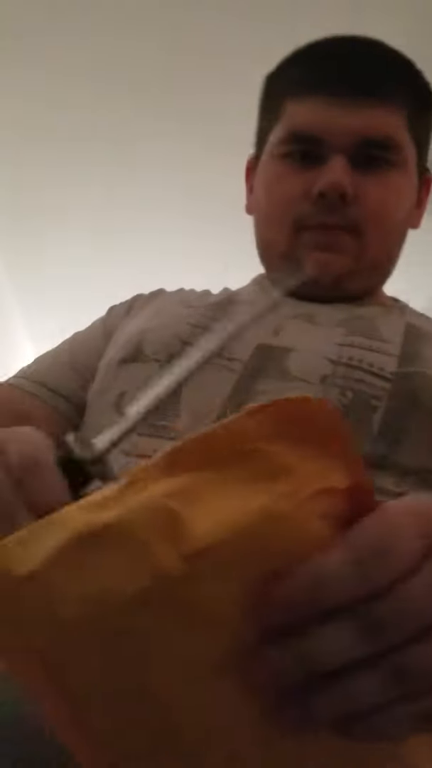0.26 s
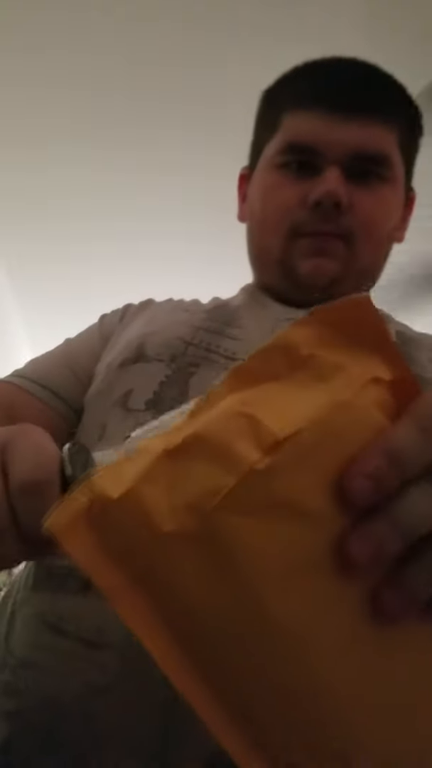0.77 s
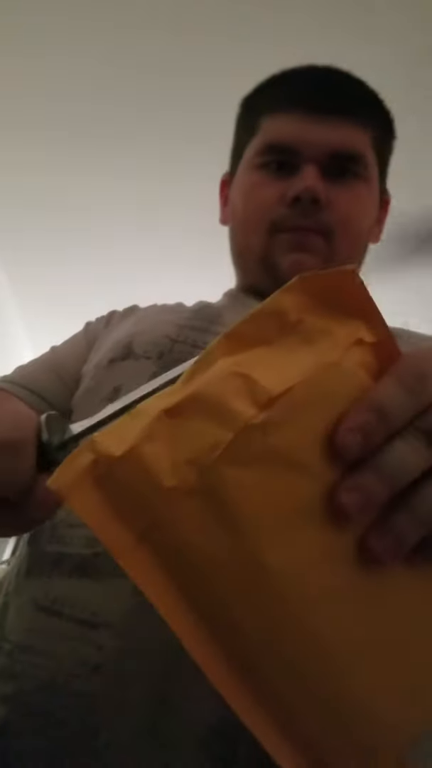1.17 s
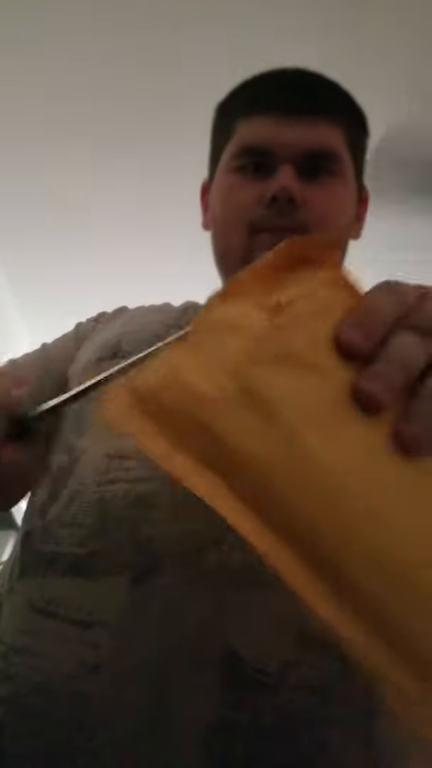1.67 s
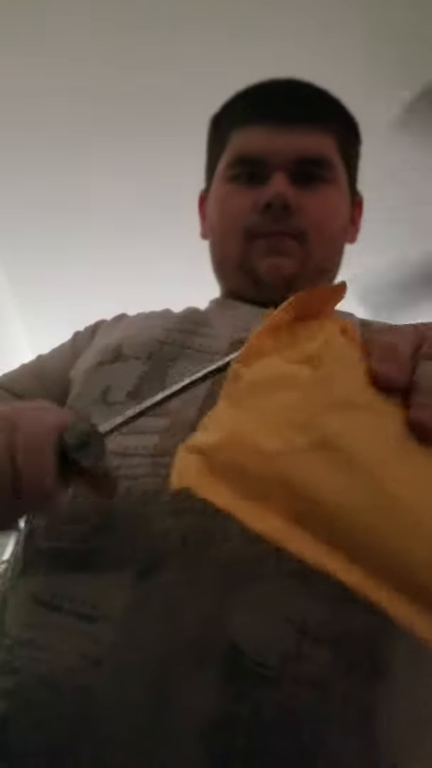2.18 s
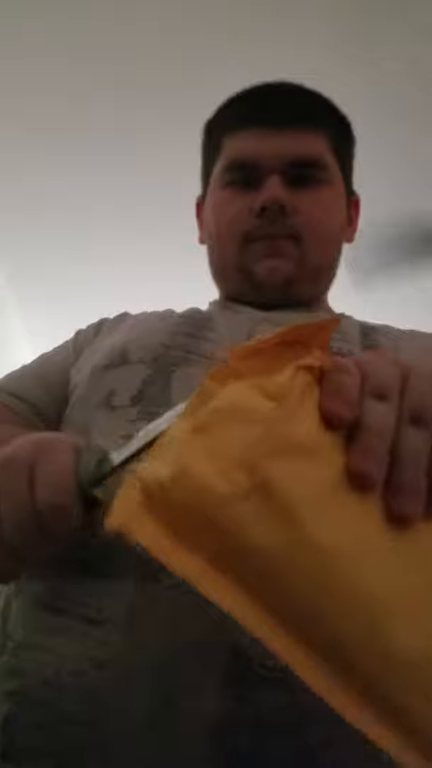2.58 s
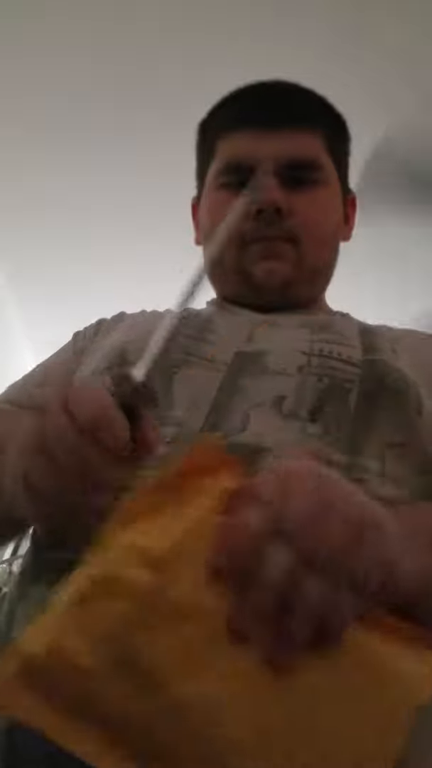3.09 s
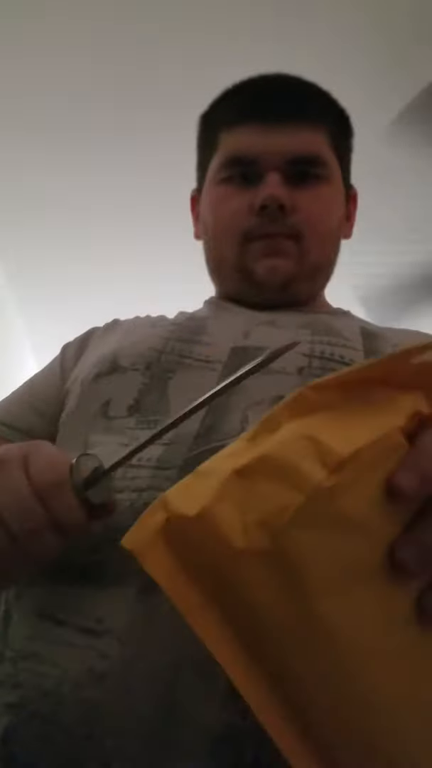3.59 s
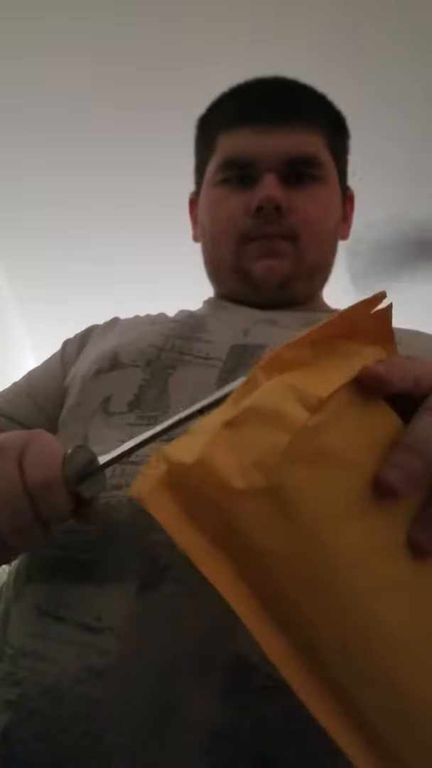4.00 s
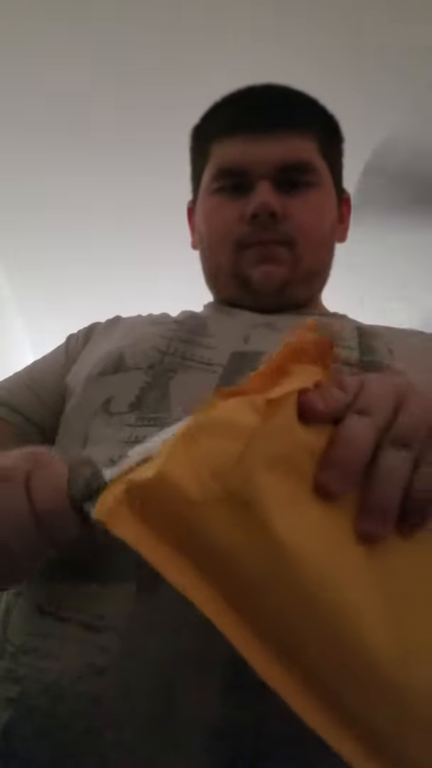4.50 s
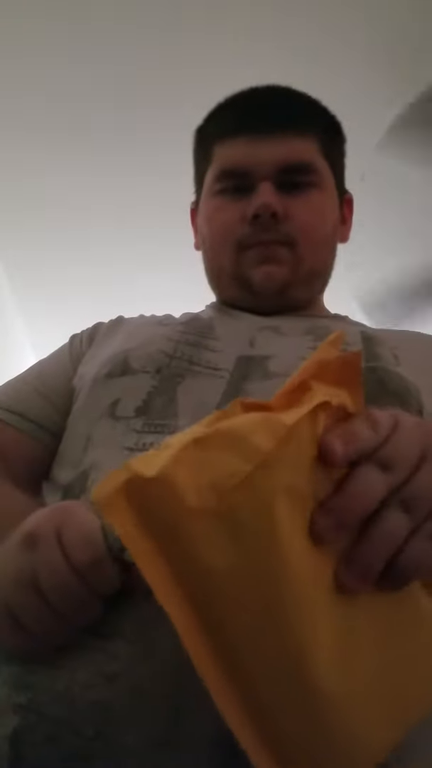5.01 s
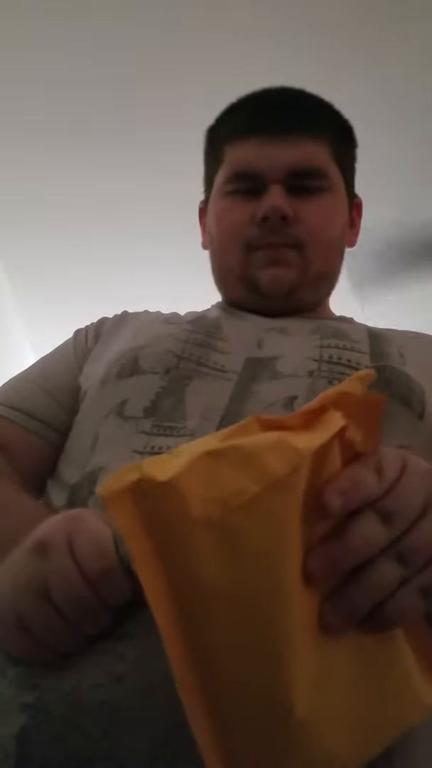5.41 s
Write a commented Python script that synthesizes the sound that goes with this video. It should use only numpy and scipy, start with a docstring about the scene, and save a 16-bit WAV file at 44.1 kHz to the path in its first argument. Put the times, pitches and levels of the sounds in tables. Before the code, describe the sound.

Stiff paper clicks and buckles in the hand while a knife makes brief fibrous rasps. Light handling and isolated snaps lead to a sudden strong cut and crack midway, then a lull with faint rustling. The final stretch is denser, with tearing rasps, crisp snaps and continuous crinkling. Close phone pickup in a small room with quick reflections and low background hum.

```python
"""Knife slitting a padded envelope

A long knife slits the flap of a padded paper envelope, held close to a phone in a small, bare room.
The blade's short rasping strokes and the sliding fingers are noise, roughened by fibres that let go.
The stiff, hollow envelope snaps as it buckles (sharp ringing pulses) and crinkles in the hand (tiny ticks).
The walls answer with fading noise echoes, and the room hums faintly."""
import sys
import numpy as np
from scipy import signal
from scipy.fft import rfft, irfft, next_fast_len
from scipy.io import wavfile
from scipy.ndimage import map_coordinates

SR = 44100
rng = np.random.default_rng(int(sys.argv[2]) if len(sys.argv) > 2 else 0)


def unload_wav(signal):
    """Save mono or channel-first audio to the path in sys.argv[1] as 16-bit WAV at rate SR, clipped to [-1, 1]."""
    wavfile.write(
        sys.argv[1],
        SR,
        np.round(np.clip(np.atleast_2d(signal).T, -1, 1) * 32767).astype(np.int16),
    )


N = 249165  # length in samples
TIME = np.arange(N) / SR  # seconds

# Levels in the tables of events and grip are set before the mix trims in the functions below.
# Blade strokes; bite_s is the time to full bite, sag_db the drop by the end, body and hiss are relative to rasp:
# start_s, length_s, bite_s, rasp_db, sag_db, body_db, hiss_db, panel_hz
BLADE_STROKES = [(0.0, 0.054, 0.001, -43.5, 5, -2.5, 0.5, 1920),
                 (0.708, 0.026, 0.0029, -33, 8, -10.5, -11.5, 1260),
                 (0.82, 0.073, 0.03, -41, -0.5, -12.5, -13, 1840),
                 (0.995, .11, 0.047, -46.5, 3.5, -1, -15, 990),
                 (1.173, 0.083, 0.03, -48, 2.5, -0.5, -19, 850),
                 (2.349, 0.19, 0.096, -47.5, 16, 1.5, -2.5, 2450),
                 (2.725, .105, 0.11, -43.5, -6.5, -5, -7.5, 1540),
                 (2.84, 0.085, 0.04, -20, 4, -11, -6.5, 2270),
                 (2.997, 0.066, 0.0051, -37.5, 11.5, 2.5, -11.5, 1040),
                 (3.748, .028, .003, -51, 2.5, -6.5, 7, 1520),
                 (3.84, 0.027, 0.0016, -39, 8.5, 1.5, -13, 1380),
                 (3.864, 0.076, 0.023, -36, 10, -4, -15, 1500),
                 (3.98, 0.054, 0.038, -42.5, 6, 5.5, -19.5, 1750),
                 (4.313, 0.066, 0.0014, -31, 5, -6.5, -18, 1420),
                 (4.457, 0.031, 0.027, -23.5, 0.5, -16.5, -13, 1430)]
BITE_POWER, STROKE_T60_S = 1.17, 0.04  # the bite grows as this power of time; fall by 60 dB once it stops

# Paper buckling or giving way; thump to fizz (low to high) are relative to level:
# start_s, level_db, thump_db, knock_db, edge_db, fizz_db, ring_hz
BUCKLES = [(0.046, -5, 4, -22, -2, 1.5, 2400), (0.0484, -3, 24, 6.5, -18, -31, 1840),
           (0.4646, -35, 14, 18, -13, -9, 575), (0.71, -3, -1, 7.5, -12, -20, 1340),
           (0.7807, -5, 10, 3.5, -11, -20, 543), (0.7914, -9.5, 13, 8, -7.5, -18, 584),
           (0.952, -32.5, 25, 27, -21, -23, 587), (1.075, -9, 0, 2.5, -14.5, -12.5, 2050),
           (1.6662, 6.5, -9, 0, -4, -5, 1470), (1.6737, -6.5, -13.5, 11, -16, -14, 1250),
           (1.69, 7, 4, 6, -25, -23, 1070), (1.6999, -1.5, 8, 8, -8.5, -15.5, 417),
           (2.3496, -14, 16, 15, -7.5, -24, 540), (2.3828, -15, -7, 2, -15, -9, 1280),
           (2.442, -15, -9, 9, -11, -3, 1300), (2.6569, -20, 9, 6, -10.5, -30, 394),
           (2.74, -5, -30, 2.5, -10.5, -31, 970), (2.8151, -2.5, -3.5, 3.5, -15.5, -41, 905),
           (2.9165, 13, -2.5, -1.5, -13, -24.5, 2090), (2.9218, 20.5, 2, -3.5, -17, -28, 430),
           (2.9346, -2.5, 8, 10.5, -15.5, -19.5, 493), (3.0028, -5.5, -8, 2, -0.5, -15.5, 2260),
           (3.0062, -8, 9, 20.5, -27, -33.5, 980), (3.0183, -9.5, 27.5, 16.5, -16.5, -11, 905),
           (3.3968, -20.5, 14.5, 11, -14, -16, 506), (3.5295, -22, 13, 9, -21, -25, 434),
           (3.56, -19, 16.5, 4, -23, -29, 385), (3.7976, -17, 8, 9, -15, -13.5, 1720),
           (3.8406, -9.5, 13, 7, -19, -21.5, 1340), (4.1674, -13.5, -23, 6, -6, -27, 2760),
           (4.2338, -10.5, -1, 6, -15, -37, 920), (4.314, 1, -25, -7, -10, -38, 1350),
           (4.3462, 9.5, -17, -6.5, -5.5, -19, 1400), (4.4222, 5, 2, 7, -4.5, -20.5, 1420),
           (4.4486, 4.5, -2, 0, -14.5, -19.5, 820), (4.478, 5, 5, 5.5, -11, -28, 1510),
           (4.484, 12, 13, 7.5, -23, -18, 590), (4.5921, -9, -12, -3, -4.5, -4.5, 1510),
           (4.7655, 5, -7.5, -5.5, 4.5, 1.5, 1360), (4.7661, -4, -11, -10, 5, 3.5, 1910),
           (4.834, -9, 8, 6, -18, -22, 1140), (4.856, 8.5, -16, -7.5, -10.5, -21.5, 1390),
           (4.9607, -20.5, -7, -7, -7.5, -4, 1340), (5.0199, -12, -1, 5, -4.5, -2.5, 1180),
           (5.058, -0.5, -17, -2, -1.5, -12.5, 1950), (5.0693, 0, -16, -9, -10, -20, 1420),
           (5.084, -10, 12, 12.5, -18, -39, 850), (5.0975, -9, -16, -4, 0, -2.5, 1760),
           (5.1307, -3, -11, 10.5, -25, -24, 543), (5.2087, 6, -8, 7, -23, -31, 1580),
           (5.264, 12.5, -6, 8, -3, -8.5, 1890), (5.2958, 3, -9, 3, -7.5, -12.5, 1860),
           (5.3516, -14.5, -12, 10, 5, 5, 2410), (5.4385, -21.5, -9, 9, 4.5, 2, 547),
           (5.4514, -20.5, -7, 20, -20, -15, 547), (5.4747, -22.5, -3, 20, -13, -8.5, 544),
           (5.56, 1.5, -8, 13.5, -6, -33.5, 1460)]

# Colours of rubbed paper, where only the shape counts: pitch_hz, level_db (per Hz)
BODY_COLOUR = [(50, -49), (110, -15.5), (220, -7.5), (450, -1), (650, -3.5), (900, -10.5), (1600, -40)]  # hollow envelope
RASP_COLOUR = [(350, -43), (600, 1), (850, 1.5), (1500, 5.5), (2300, 2.5), (2850, 2), (3400, -6.5),
               (5300, -15.5), (6800, -33), (12000, -51)]  # paper sheet
HISS_COLOUR = [(2500, 1), (3900, 5), (4800, 3), (6600, 1.5), (7800, -0.5), (8800, 3.5), (9900, -2.5),
               (11500, 1.5), (15500, -0.5)]  # fine fibres
# Colour of tiny creases, where only the shape counts: pitch_hz, level_db (per Hz)
CREASE_COLOUR = [(400, -26.5), (1200, 0), (2800, 1.5), (4500, 0), (8000, -7), (15000, -1)]

# Steady pressure of the holding hand: time_s, rustle_db
HAND_GRIP = [(0.1, -73.5), (0.3, -74.5), (0.66, -77.5), (1.32, -73), (1.5, -64.5), (1.9, -70), (2.2, -71.5),
             (2.62, -67), (3.1, -65.5), (3.37, -65.5), (3.45, -72.5), (3.66, -72.5), (4.15, -63.5),
             (4.6, -56), (4.95, -59.5), (5.2, -59), (5.64, -57.5)]
# The fingers shift their hold; body and hiss are relative to rustle:
# peak_s, rustle_db, t60_s, body_db, hiss_db
FINGER_SHIFTS = [(0.43, -64, 0.52, 4.5, -8.5), (0.97, -57, 0.61, 3, -17.5), (1.422, -62.5, 0.35, 0, 1.5),
                 (2.0, -72.5, 0.57, -8, 3.5), (2.3, -59.5, 0.93, -19, -7.5), (2.985, -41.5, 0.21, 1.5, -11),
                 (3.32, -67.5, 0.28, -12, 5.5), (3.96, -59.5, 0.37, 9, -15), (4.18, -53, .5, -5, -3.5),
                 (4.26, -53.5, 0.59, 0, -14), (4.4, -49, 0.43, -6, -3.5), (4.691, -49.5, 0.17, -17, -2),
                 (4.798, -42.5, 0.33, -17, 1), (5.089, -46, 0.17, -5, -12), (5.32, -47.5, .6, -9, 3),
                 (5.539, -49.5, 0.55, -15, 3)]
SHIFT_RISE_DB_PER_S = 328  # how fast a shift swells
GRIP_HISS_DB = -3  # fibre hiss of the steady grip, relative to its rustle
LIGHT_GRIP_DB, HOLLOW_DB = -68, -65  # rustle and body sound of a light grip
HOLLOW_FOLLOW = 0.2  # dB of body sound gained per dB of grip (pressing damps it)

# Colour of the background air, where only the shape counts: pitch_hz, level_db (per Hz)
AIR_COLOUR = [(15, -31.5), (25, -19.5), (45, -23.5), (75, -8), (110, 0.5), (145, -5), (260, -1.5),
              (420, -7), (800, -30), (1300, -18.5), (2100, -23.5), (4000, -26), (7300, -35.5),
              (9800, -33.5), (14000, -28.5), (16000, -28)]
# Time for echoes to fall by 60 dB: pitch_hz, t60_s
ECHO_T60 = [(120, 0.44), (500, 0.24), (2000, 0.23), (6000, 0.25), (15000, 0.29)]
# Colour of the echoes: pitch_hz, gain_db
ECHO_COLOUR = [(100, 0), (400, -2.5), (900, 2), (1600, -1.5), (3000, 2.5), (5000, 3), (9000, 1.5),
               (14000, -0.5)]
# How much the right port is favoured over the left: pitch_hz, difference_db
RIGHT_LOUDER_BY = [(100, 0), (300, 1.5), (600, 0.5), (1200, 2.5), (3000, 5.5), (8000, 1.5), (14000, 3.5)]
# How alike left and right are (1 is identical): pitch_hz, likeness (no unit)
PORT_LIKENESS = [(60, 0.64), (150, 0.96), (600, 0.81), (1500, 0.53), (3500, 0.29), (7000, 0.063),
                 (15000, 0.04)]
TOP_HZ = 15950  # the phone's band limit


def amp(db):
    """Decibels to gain."""
    return 10 ** (np.asarray(db) / 20)


def unit(x):
    """Scale to an average (rms) level of 1."""
    return x / np.sqrt(np.mean(x ** 2) + 1e-20)


def along(points, hz):
    """Read (Hz, value) points at any pitch, on a log axis."""
    f, v = np.transpose(points)
    return np.interp(np.log(hz + 1), np.log(f + 1), v)


def wobble(rate):
    """A smooth random curve with rate random points a second."""
    return map_coordinates(rng.standard_normal(int(N * rate / SR) + 4), [TIME * rate])


def filtered(x, response):
    """Multiply the spectrum of x by a response that depends on pitch."""
    size = next_fast_len(N + SR // 2)
    hz = np.fft.rfftfreq(size, 1 / SR)
    return irfft(rfft(x, size) * response(hz), size)[..., :N]


def causal(gain):
    """The most compact pulse with this gain curve, sounding only after its start (minimum phase)."""
    cepstrum = irfft(np.log(np.maximum(gain, 1e-6)))
    half = len(cepstrum) // 2
    cepstrum[1:half] *= 2
    cepstrum[half + 1:] = 0
    return irfft(np.exp(rfft(cepstrum)))


def ports(pair, spectrum):
    """Two unrelated sounds become a coloured left and right; the ports are close, so they agree in the bass."""
    def response(hz):
        turn = np.arccos(np.clip(along(PORT_LIKENESS, hz), -1, 1)) / 2
        return amp(along(spectrum, hz)) * [np.cos(turn), np.sin(turn)]

    mid, side = filtered(pair, response)
    return np.array([mid + side, mid - side])


def rush(spectrum, drive=1):
    """Stereo noise of rms 1, shaped in time by drive and then coloured."""
    return unit(ports(drive * rng.standard_normal((2, N)), spectrum))


def fibres(rate, spread_db, life, smooth):
    """Loudness curve of fibres letting go at random moments and sizes, over a share of smooth sliding."""
    sizes = amp(spread_db * np.minimum(rng.standard_exponential(N), 3.5))  # no freak giants
    breaks = (rng.random(N) < rate / SR) * sizes ** 2
    power = signal.lfilter([1], [1, -np.exp(-2 / (life * SR))], breaks)  # each break dies away
    share = np.clip(smooth, 0, 1)
    return np.sqrt(share + (1 - share) * power / power.mean())


def paper(gains, drive, body_db, rasp_db, hiss_db):
    """Rubbed paper: one drive shakes the hollow body, the sheet and its fine fibres."""
    level, body, hiss = gains
    hollow = body * amp(body_db) * rush(BODY_COLOUR, drive)
    sheet = level * amp(rasp_db) * rush(RASP_COLOUR, drive)
    fine = hiss * amp(hiss_db) * rush(HISS_COLOUR, drive)
    return hollow + sheet + fine


def cutting():
    """Gains of sheet, body and fibres: each stroke bites, sags as the paper yields, and stops."""
    power = np.zeros((3, N))
    for start, length, bite, db, sag_db, body_db, hiss_db, _ in BLADE_STROKES:
        t = TIME - start
        attack = np.clip(t / bite, 0, 1) ** BITE_POWER
        sag = sag_db * np.clip((t - bite) / max(length - bite, 1 / SR), 0, 1)
        release = 60 * np.maximum(t - length, 0) / STROKE_T60_S
        stroke = attack * amp(db - sag - release)
        power += np.outer(amp([0, body_db, hiss_db]), stroke) ** 2
    return np.sqrt(power)


def panel(x, peak_db, width):
    """The taut panel beside the cut favours one broad band of the rasp."""
    hz, t, z = signal.stft(x, SR, nperseg=256)
    start, length, *_, panel_hz = np.transpose(BLADE_STROKES)
    centre = np.interp(t, start + length / 2, panel_hz)  # glides from stroke to stroke
    bump = 1 / (1 + ((hz[:, None] - centre) / (width * centre)) ** 2)
    return signal.istft(z * amp(peak_db * bump), SR, nperseg=256)[1][:, :N]


def off_chest(x, strength, delay, drift):
    """The chest right behind the envelope sends back a copy whose delay shifts as the hands move."""
    late = delay * np.exp(drift * wobble(2.7))  # seconds
    index = np.clip(np.arange(N) - late * SR, 0, N - 1)
    copy = np.array([map_coordinates(ear, [index], order=3) for ear in x])
    return (x + strength * copy) / np.hypot(1, strength)


def blade():
    """The edge cuts thousands of fibres a second, catching and slipping a little."""
    breaks = fibres(rate=3200, spread_db=3.5, life=0.00033, smooth=0.38)
    drive = breaks * amp(1.3 * wobble(140))
    cut = paper(cutting(), drive, body_db=-1.96, rasp_db=-2.5, hiss_db=0.0)
    ringing = panel(cut, peak_db=3.5, width=0.2)
    return off_chest(ringing, strength=0.29, delay=0.001058, drift=0.1645)


def handling():
    """Gains of sheet, body and fibres: a steady grip, and a swell that fades each time the fingers shift."""
    grip = np.interp(TIME, *np.transpose(HAND_GRIP))
    hollow = HOLLOW_DB + HOLLOW_FOLLOW * (grip - LIGHT_GRIP_DB)
    power = amp([grip, hollow, grip + GRIP_HISS_DB]) ** 2
    for peak, db, t60, body_db, hiss_db in FINGER_SHIFTS:
        t = TIME - peak
        swell = amp(db + np.minimum(SHIFT_RISE_DB_PER_S * t, -60 * t / t60))
        power += np.outer(amp([0, body_db, hiss_db]), swell) ** 2
    return np.sqrt(power)


def rustle():
    """Fingers slide on the envelope, freeing fibres now and then over a mostly smooth rub."""
    drive = fibres(rate=110, spread_db=2.5, life=0.0019, smooth=0.67) * amp(1.3 * wobble(30))
    return paper(handling(), drive, body_db=-2.5, rasp_db=-1.0, hiss_db=-1.0)


def creases(rate, spread_db, tick_db, follow):
    """Tiny creases flip one by one, louder the more the hand works the envelope."""
    _, _, hiss = handling()
    size = amp(spread_db * np.minimum(rng.standard_exponential(N), 2.5))
    flips = (rng.random(N) < rate / SR) * size ** 2
    power = signal.lfilter([1], [1, -np.exp(-1 / (0.00079 * SR))], flips)  # each flip dies away
    return amp(tick_db) * hiss ** follow * rush(CREASE_COLOUR, np.sqrt(power))


def room_tone(air_db, hum_db, hum_hz):
    """Dull background air with a narrow, wavering hum, both made from coloured noise."""
    hum_colour = [(hum_hz * 0.98, -40), (hum_hz * 0.893, -8), (hum_hz, 0),
                  (hum_hz * 1.15, -8), (hum_hz * 2.1, -40), (1000, -100)]
    hum = rush(hum_colour)
    return amp(air_db) * rush(AIR_COLOUR) + amp(hum_db) * hum


def walls(x, gap):
    """The room answers after a short gap; as the envelope moves, the pattern of echoes keeps changing."""
    echo = np.zeros((2, N))
    for part in np.array_split(np.arange(N), 16):  # a fresh echo pattern for each slice of time
        hz, t, z = signal.stft(rng.standard_normal((2, SR // 3)), SR, nperseg=256)
        fade = amp(-60 * t / along(ECHO_T60, hz)[:, None])
        tail = signal.istft(z * fade, SR, nperseg=256)[1]
        tail = np.pad(tail / np.linalg.norm(tail[0]), ((0, 0), (round(gap * SR), 0)))
        # the right channel feeds both echo channels
        answer = signal.fftconvolve(x[1:, part], tail, axes=1)[:, :N - part[0]]
        echo[:, part[0]:part[0] + answer.shape[1]] += answer
    return ports(echo, ECHO_COLOUR)


def snap(thump, knock, edge, fizz, ring_hz, ring_db, ring_width, hollow_hz, hollow_db):
    """One buckle: a sharp pulse that rings its panel and the air inside the envelope for a few cycles."""
    hz = np.fft.rfftfreq(2048, 1 / SR)
    colour = [(30, thump - 28), (100, thump - 10), (220, thump - 1),
              (480, knock - 1), (1100, knock - 3), (1700, 0.72), (2700, 0.21),
              (4000, edge + 1), (6500, edge - 1), (8500, fizz - 1), (15000, fizz)]

    def bump(centre, width):
        return 1 / (1 + ((hz - centre) / (width * centre)) ** 2)

    ring = ring_db * bump(ring_hz, ring_width)
    hollow = hollow_db * bump(hollow_hz, 0.17)
    return causal(amp(along(colour, hz) + ring + hollow))


def snaps(size_db, flutter, flutter_t60, spread_t60, width):
    """Each buckle is a short burst, followed by a few milliseconds of flutter as it runs through the sheet."""
    out = np.zeros((2, N + SR))
    t = np.arange(SR // 40) / SR
    lead = SR // 1000  # a millisecond of room ahead of the burst
    fade = amp(-60 * t / flutter_t60) * (1 - np.exp(-t / 0.00095))
    fade /= np.linalg.norm(fade)
    # a buckle comes from one spot, so it is narrower than the rubbing
    likeness = along(PORT_LIKENESS, np.fft.rfftfreq(len(t), 1 / SR))
    turn = width * np.arccos(np.clip(likeness, -1, 1))
    for s, db, *colour in BUCKLES:
        jolt, shiver = rng.standard_normal((2, 2, len(t)))
        # the crease gives way within a millisecond, pushing equally at all pitches
        burst = rfft(jolt * amp(-60 * t / spread_t60))
        near, other = burst / np.abs(burst) + rfft(flutter * fade * shiver)
        # long waves reach both ports alike, short ones differently
        left = np.cos(turn) * near + np.sin(turn) * other
        both = irfft(np.array([left, near]), len(t))
        push = np.roll(both, lead, axis=1)[:, :len(t) // 2]
        pulse = snap(*colour, ring_db=10.0, ring_width=0.14, hollow_hz=490, hollow_db=3.5)
        sound = signal.fftconvolve(push, pulse[None], axes=1) / np.hypot(1, flutter)
        start = round(s * SR) - lead
        out[:, start:start + sound.shape[1]] += amp(db + size_db) * sound
    return out[:, :N]


def scene():
    """Mix every source, with the envelope nearer the right port, then add the walls and the room tone."""
    buckles = snaps(size_db=-3.75, flutter=0.83, flutter_t60=0.01, spread_t60=0.0012, width=0.8)
    crinkle = creases(rate=26, spread_db=1.5, tick_db=-6.5, follow=0.87)
    direct = blade() + rustle() + crinkle + buckles
    halves = np.array([[-0.5], [0.5]])  # left down, right up by half the difference
    placed = filtered(direct, lambda hz: amp(along(RIGHT_LOUDER_BY, hz) * halves))
    echo = amp(-14.0) * walls(direct, gap=0.0105)
    return placed + echo + room_tone(air_db=-64.5, hum_db=-66.0, hum_hz=129.2)


def record(dry):
    """The phone clips at full scale and keeps nothing above its band limit."""
    return filtered(np.clip(dry, -1, 1), lambda hz: hz < TOP_HZ)


dry = scene()
out = record(dry)
unload_wav(out)
```